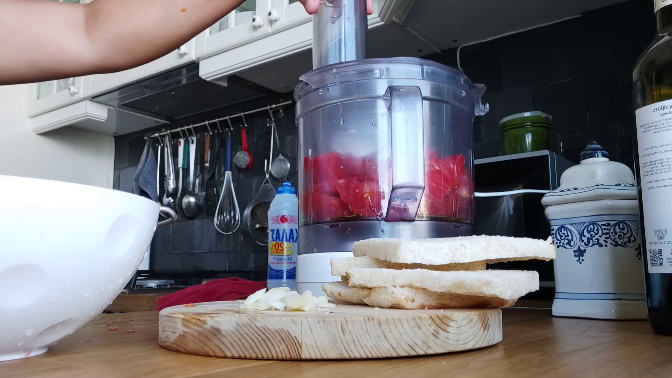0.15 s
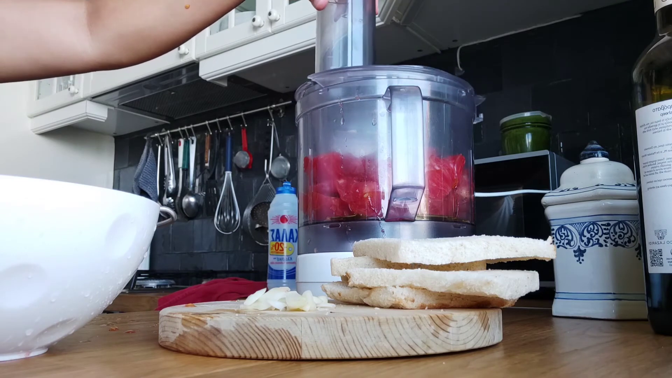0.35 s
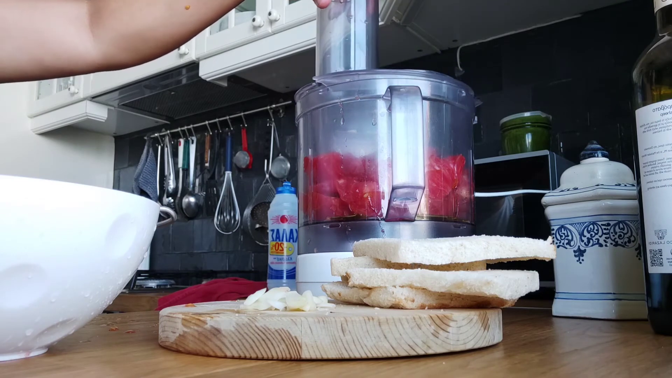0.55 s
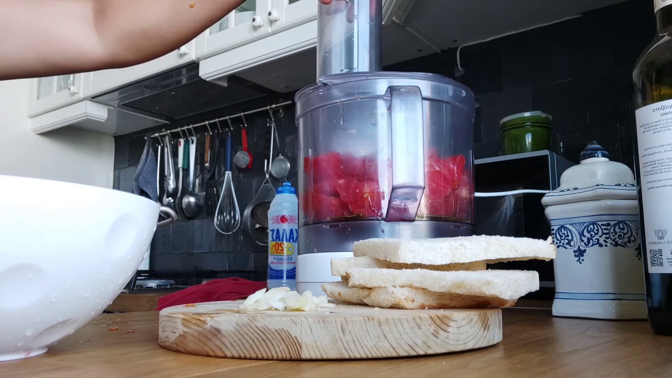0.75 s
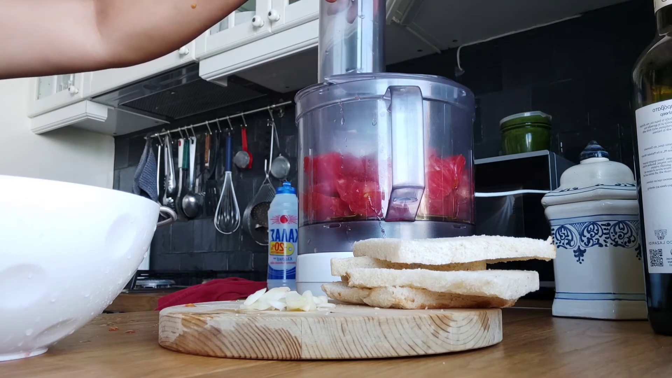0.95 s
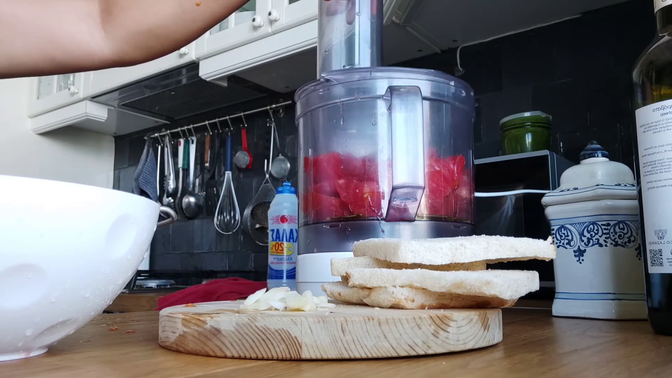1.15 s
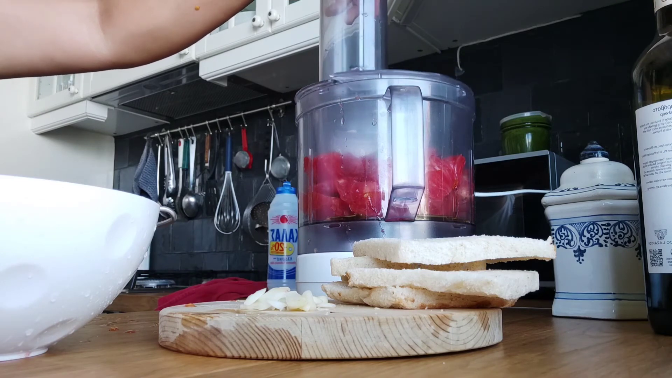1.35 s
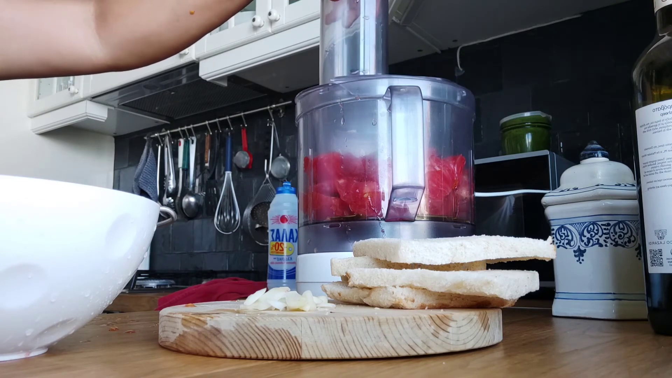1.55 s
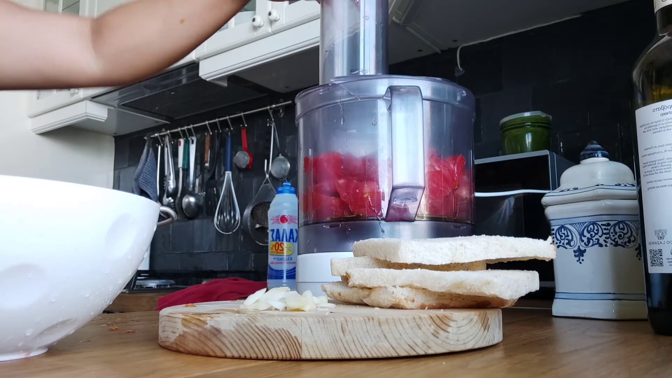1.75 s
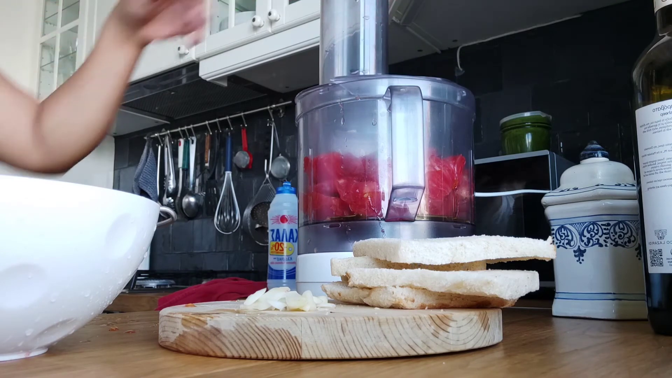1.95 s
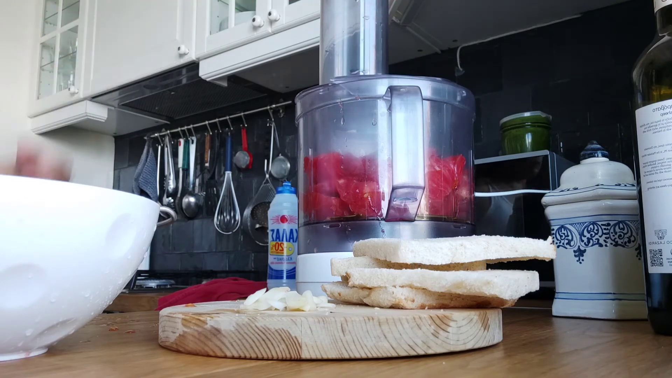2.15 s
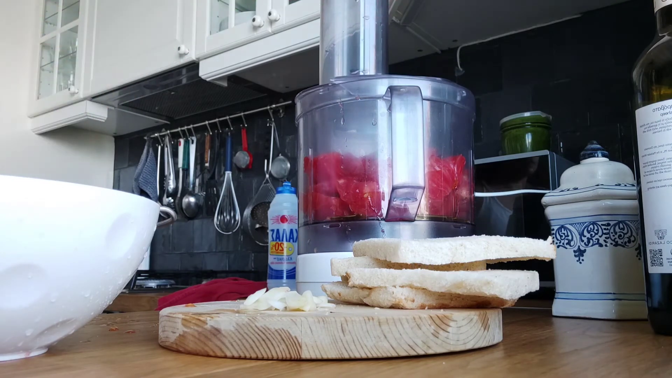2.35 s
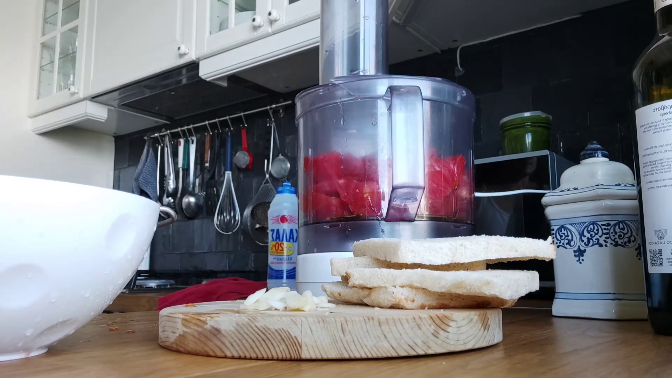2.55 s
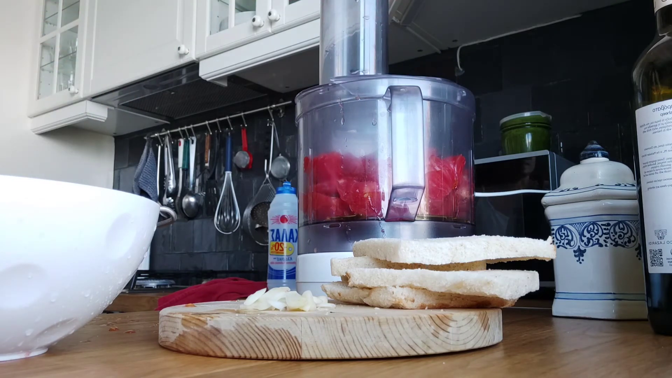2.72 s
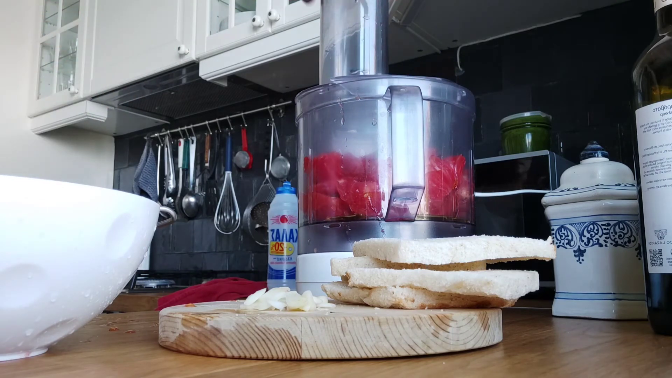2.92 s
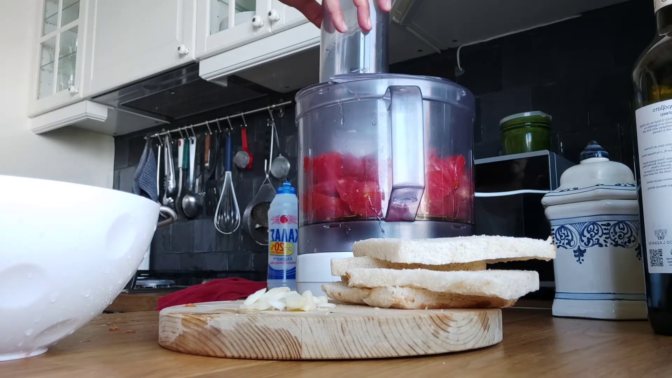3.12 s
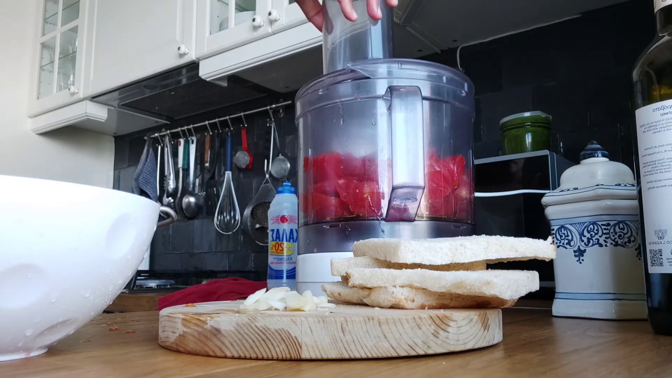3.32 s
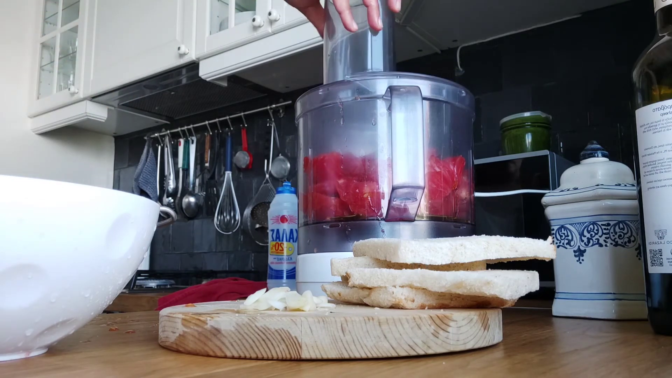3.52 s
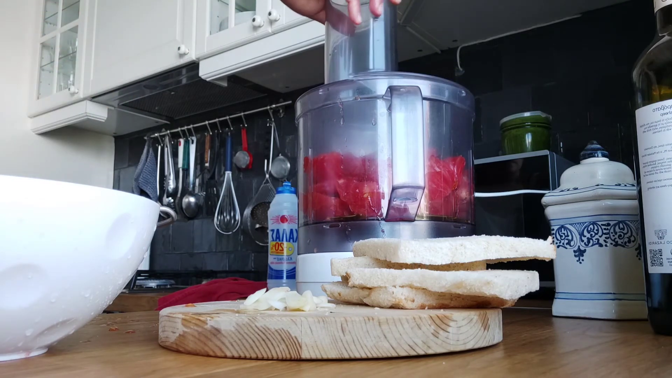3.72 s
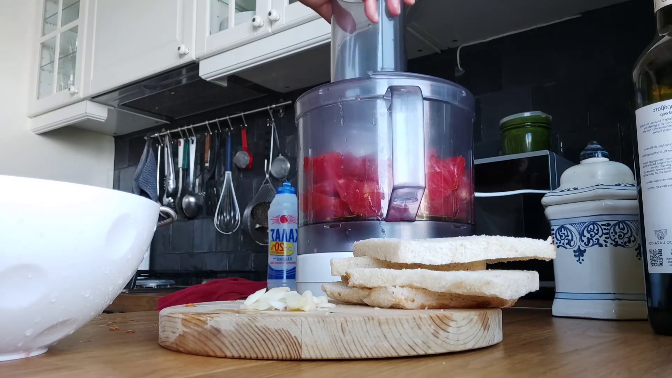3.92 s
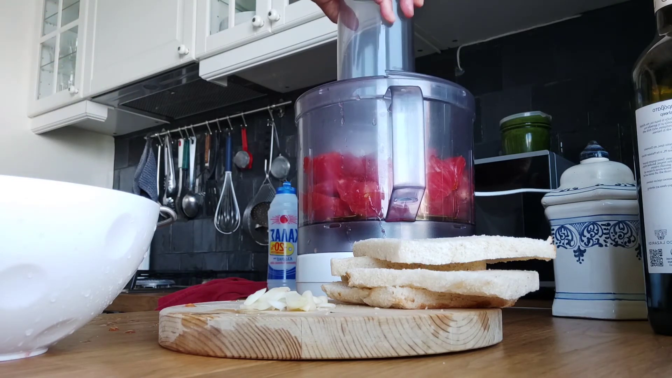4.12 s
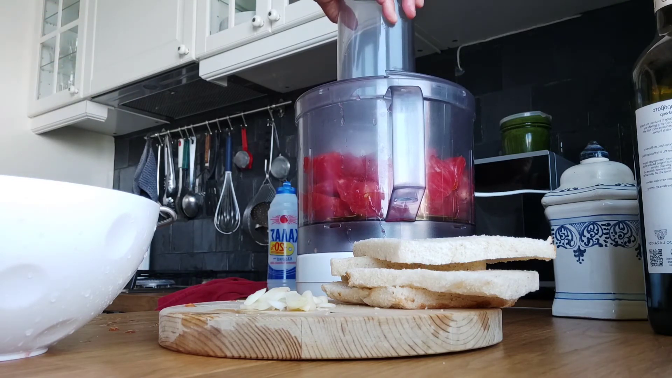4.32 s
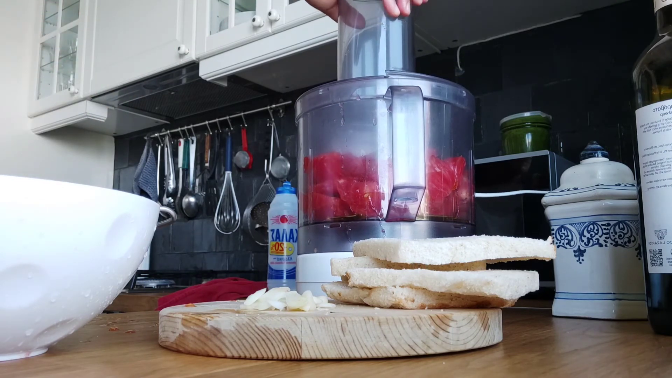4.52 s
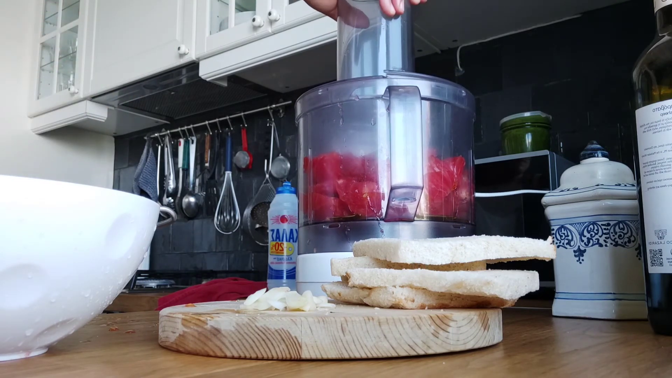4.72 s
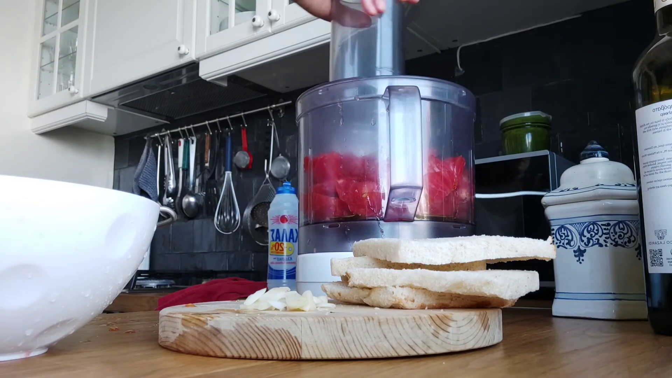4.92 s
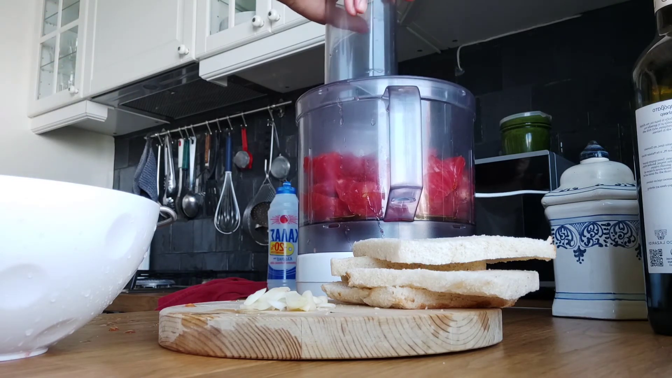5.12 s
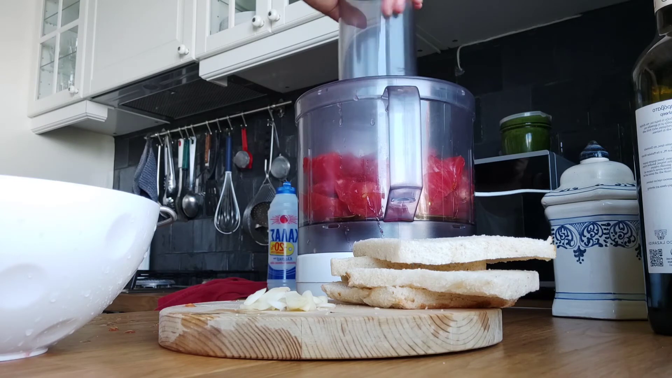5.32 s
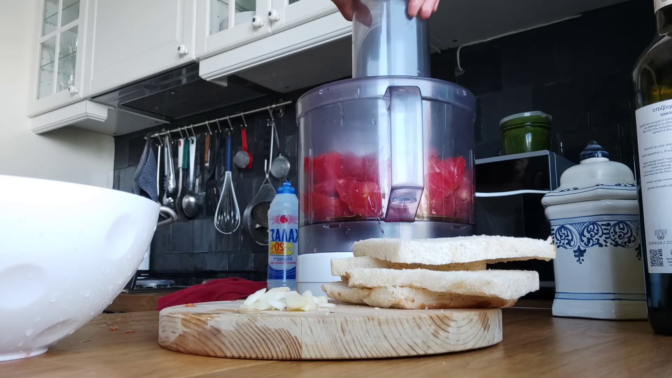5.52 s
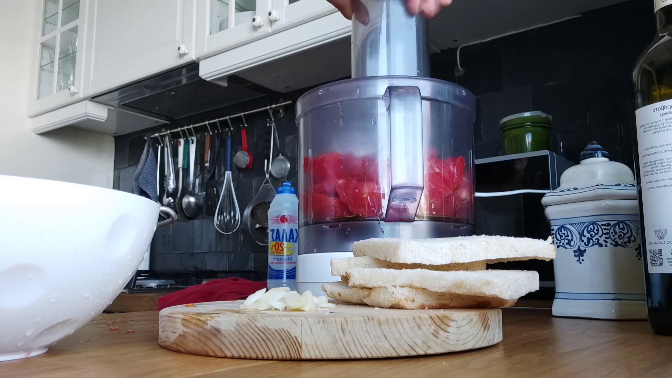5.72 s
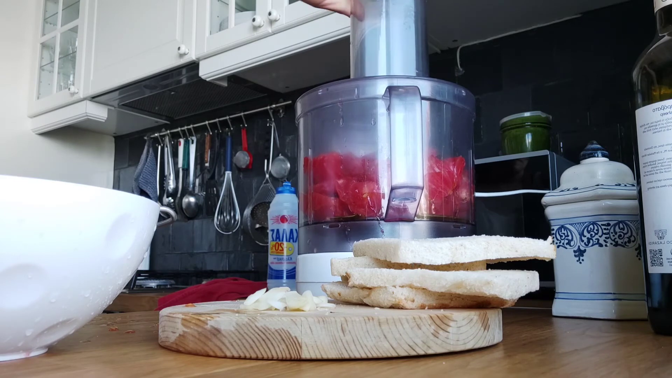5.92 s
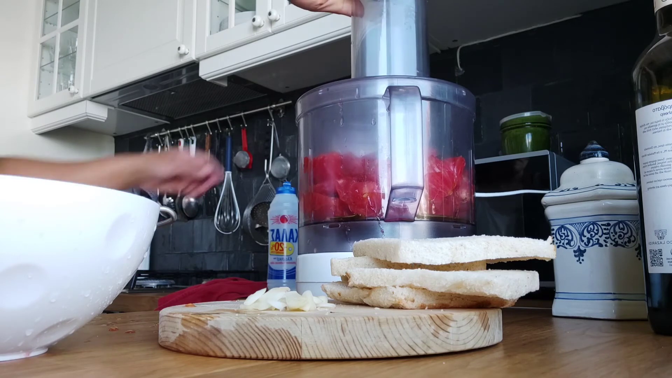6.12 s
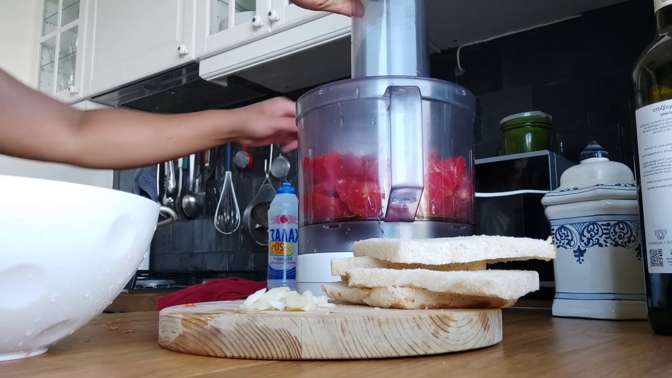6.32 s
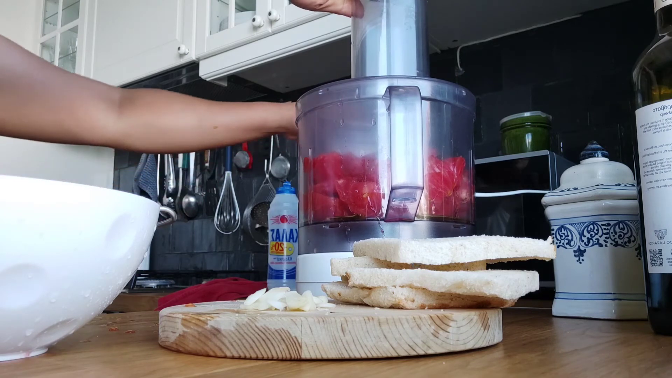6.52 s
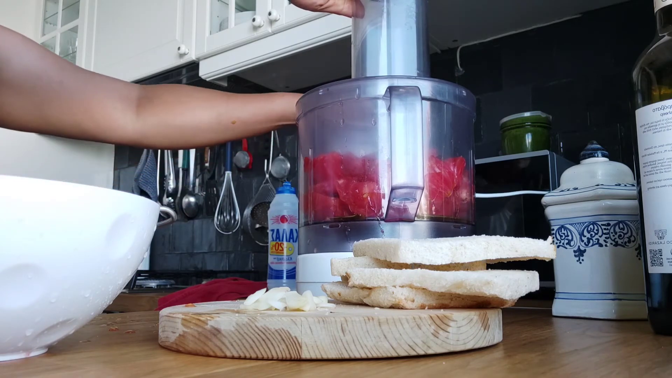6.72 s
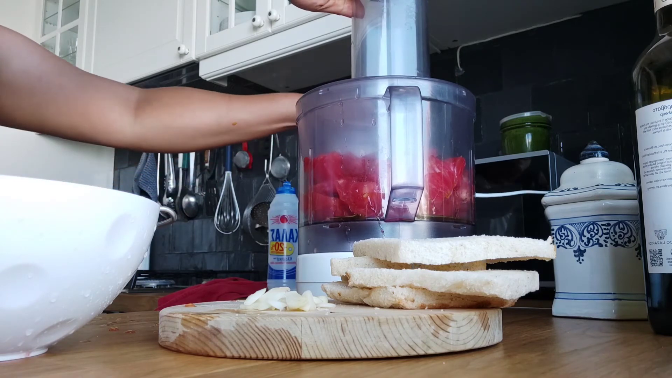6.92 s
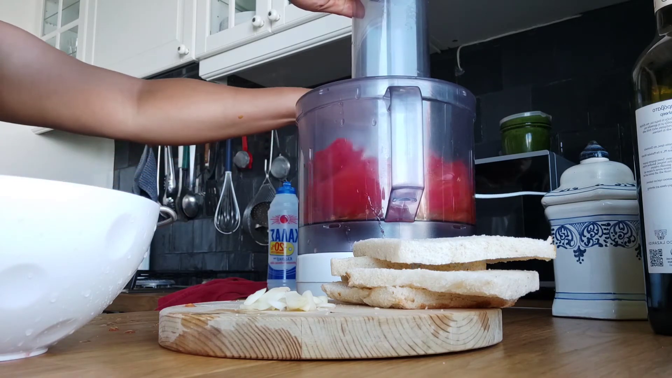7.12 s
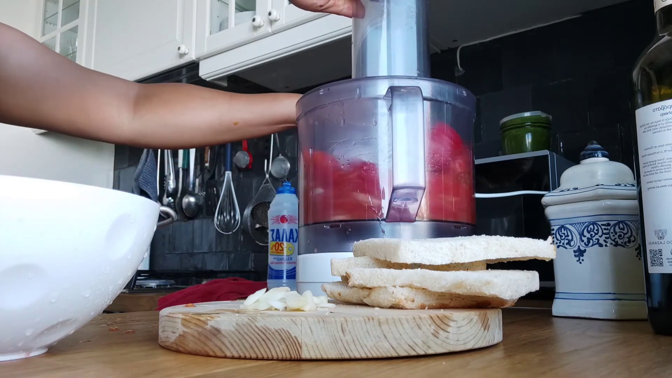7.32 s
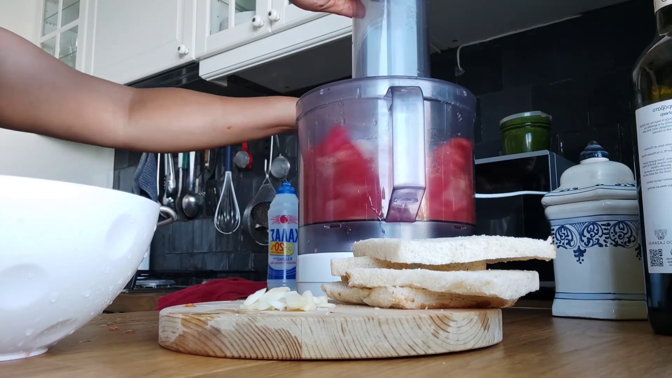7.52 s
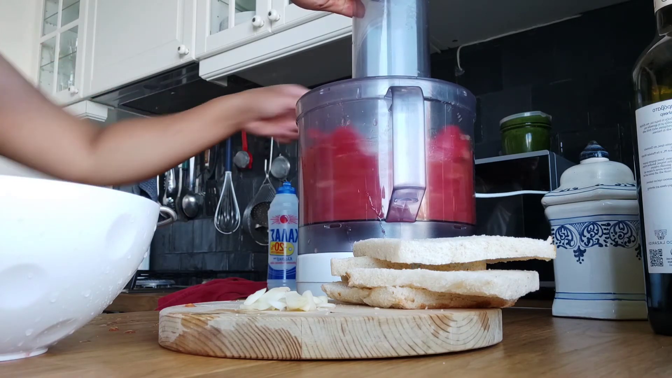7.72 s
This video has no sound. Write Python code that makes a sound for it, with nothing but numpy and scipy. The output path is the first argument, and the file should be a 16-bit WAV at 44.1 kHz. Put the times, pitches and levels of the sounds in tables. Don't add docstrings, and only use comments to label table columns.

```python
import sys
import numpy as np
from scipy import signal
from scipy.fft import rfft, irfft, next_fast_len
from scipy.io import wavfile
from scipy.ndimage import uniform_filter1d

SR = 44100
rng = np.random.default_rng(int(sys.argv[2]) if len(sys.argv) > 2 else 0)


def wav_out(sig):
    wavfile.write(sys.argv[1], SR, np.round(np.clip(np.atleast_2d(sig).T, -1, 1) * 32767).astype(np.int16))


def boost_factor(decibels):
    exponent = np.asarray(decibels, float) / 20
    return 10 ** exponent


N = 346626
T = np.arange(N) / SR
SIZE = next_fast_len(N)

# start in seconds, wall level in dB, wall note in Hz,
# bowl air level in dB, crack level in dB.
LID_TURN_KNOCKS = [(0.004, -38.5, 1220, -47, -43.5), (0.08, -35, 956, -63, -49),
                   (0.145, -39, 475, -36, -49), (0.259, -25, 610, -27, -33),
                   (0.316, -16.5, 573, -23.5, -29.5), (0.348, -20, 578, -32, -31),
                   (0.37, -31, 600, -45, -52), (0.439, -53, 452, -59, -62), (0.49, -31, 1060, -36.5, -43.5),
                   (0.597, -68, 477, -41.5, -50), (0.704, -40, 964, -58, -51),
                   (0.815, -21.5, 1092, -32, -33.5), (0.944, -25, 480, -24.5, -32),
                   (1.101, -40, 532, -43, -44.5), (1.198, -48, 1050, -50, -55),
                   (1.253, -27.5, 424, -19, -33.5), (1.309, -35, 560, -42, -44),
                   (1.367, -51, 505, -33.5, -55), (1.452, -27.5, 430, -29, -32.5),
                   (1.536, -31, 540, -34.5, -57)]
# start in seconds, wall level in dB, wall note in Hz,
# bowl air level in dB, crack level in dB.
TOUCH_KNOCKS = [
    (3.117, -37, 545, -49, -43),
    (3.135, -33, 706, -38, -53),
    (3.214, -45, 680, -48, -44),
    (3.251, -30, 1085, -29.5, -25.5),
    (3.302, -30, 550, -29, -39),
]
# start in seconds, wall level in dB, wall note in Hz,
# bowl air level in dB, crack level in dB.
ENTERING_KNOCKS = [
    (3.367, -19.5, 465, -36, -35),
    (3.425, -14, 460, -27.5, -24.5),
    (3.443, -25, 506, -31, -49),
    (3.484, -25, 572, -25.5, -28),
    (3.5, -33, 494, -45, -53),
]
# start in seconds, wall level in dB, wall note in Hz,
# bowl air level in dB, crack level in dB.
PLUGGED_KNOCKS = [(3.728, -40, 1100, -46, -42.5), (3.774, -41.5, 1050, -47, -52),
                  (3.825, -36, 530, -43, -45), (3.895, -24.5, 525, -26, -29.5), (3.959, -51, 616, -43, -39),
                  (4.011, -20, 890, -20.5, -32), (4.15, -46, 1087, -31, -26.5), (4.393, -38, 887, -70, -44),
                  (4.468, -31, 510, -28.5, -35.5), (4.509, -33.5, 520, -39.5, -42),
                  (4.655, -33, 408, -59, -51), (4.798, -35.5, 505, -37, -43)]
# start in seconds, wall level in dB, wall note in Hz,
# bowl air level in dB, crack level in dB.
LOCKING_KNOCKS = [(4.91, -18, 1100, -21.5, -17), (5.104, -27, 477, -30.5, -31),
                  (5.234, -32.5, 990, -33, -38), (5.251, -31, 458, -24.5, -46),
                  (5.283, -26.5, 650, -35, -33.5), (5.311, -27.5, 495, -25, -35),
                  (5.416, -25, 503, -30, -32.5), (5.465, -41, 466, -32, -32.5),
                  (5.511, -9.5, 870, -19, -15.5), (5.711, -52, 855, -41.5, -36),
                  (5.83, -38, 1056, -40, -40), (6.114, -45.5, 1110, -44, -49), (6.215, -47, 860, -44, -45),
                  (6.279, -40.5, 867, -44, -41), (6.479, -59, 1080, -68, -47)]
# start in seconds, wall level in dB, wall note in Hz, housing level in dB,
# crack level in dB.
SWITCH_KNOCKS = [
    (7.001, -30.5, 945, -35.5, -37.5),
    (7.027, -37, 813, -39, -61),
    (7.106, -11, 1046, -15, -21),
]
# start in seconds, wall level in dB, crack level in dB.
PIECES = [(7.217, -10, -18.5), (7.364, -12, -42), (7.415, -24, -37), (7.485, -8, -40), (7.568, -3, -20),
          (7.618, -10, -17.5), (7.712, -2, -32), (7.775, -28, -17.5)]

# mode in Hz, level in dB, t60 in seconds.
OPEN_AIR = [(384.6, 2.5, 0.17), (387.5, 6.5, 0.037), (274.6, -5, 0.072), (527, -12.5, 0.12),
            (165, -20.5, 0.2)]
# mode in Hz, level in dB, t60 in seconds.
ENTERING_AIR = [(279.8, -0.5, 0.6), (382, 0.5, 0.11), (158, -3.5, 0.11)]
# mode in Hz, level in dB, t60 in seconds.
PLUGGED_AIR = [(211.8, 2.5, 0.31), (161, -6, 0.36), (289.3, 7, 0.073), (393.2, -1, 0.16)]
# mode in Hz, level in dB, t60 in seconds.
HOUSING = [(530, 6.6, 0.06), (400, 13.3, 0.034), (240, 0.5, 0.057)]
# mode in Hz, level in dB, t60 in seconds.
WALL = [(640, -9, .04), (850, -9, .05), (1075, -9, .06), (1600, -15, .03)]
# frequency in Hz, density in dB per Hz.
CLATTER = [(300, -17), (450, 11), (650, 13.5), (850, 1.5), (1100, 3), (1400, 0.5), (2200, -45)]
# frequency in Hz, density in dB per Hz.
CRACK = [(800, 7.5), (1150, 6), (1400, 2.5), (1700, 5), (2200, -0.5), (2800, -1), (3500, -7), (4300, -10.5),
         (6000, -62)]
# frequency in Hz, density in dB per Hz.
TICK = [(2240, -6.5), (2900, -5), (3800, -8.5), (4310, -9.5), (5290, -6.5), (6520, -5.5), (7400, 0.5),
        (8550, -1.5), (11000, -18), (14300, -25), (16000, -36)]

# start in seconds, length in
# seconds, # rub level in dB, hiss level in dB, weight on the worktop in dB.
STROKES = [(0.153, 0.19, -48.5, -60, -52), (0.3, 0.042, -37, -41, -45), (0.448, 0.15, -48, -75, -56),
           (0.797, 0.12, -49, -51, -68), (0.94, 0.04, -45, -49, -49), (1.242, 0.047, -51, -44, -49.5),
           (1.37, 0.12, -40.5, -41.5, -45), (2.547, 0.034, -79, -67, -75), (2.635, .03, -72, -57, -75),
           (2.68, 0.069, -79, -50.5, -75), (3.11, 0.12, -54, -48, -59), (3.271, 0.032, -32.5, -36, -36.5),
           (3.418, 0.077, -31, -35, -37), (3.766, 0.11, -46, -48.5, -64), (3.886, 0.051, -45.5, -48, -47),
           (4.01, 0.075, -39, -47.5, -44), (4.162, 0.025, -45, -59, -48.5), (4.48, 0.05, -42.5, -65, -72),
           (4.673, 0.27, -51.5, -67, -58), (4.934, 0.059, -33.5, -20, -43.5), (5.047, 0.11, -42, -28, -64),
           (5.27, 0.094, -37, -40, -42), (5.414, 0.12, -37, -40.5, -39), (5.545, 0.16, -39.5, -35, -64),
           (5.83, 0.1, -55.5, -54, -54.5), (6.088, 0.18, -56, -62, -61), (6.995, 0.26, -46, -41.5, -46)]
# time in seconds, note in Hz.
AIR_NOTE = [
    (3.36, 375),
    (3.4, 460),
    (3.47, 457),
    (3.5, 277),
    (3.66, 277),
    (3.72, 202),
    (5.25, 215),
    (5.33, 173),
]
# frequency in Hz, density in dB per Hz.
COUNTER = [(25, -12), (40, -3), (80, 3), (130, 0), (200, -57)]

# start in seconds, note in Hz, level in dB, t60 in seconds.
PINGS = [(0.268, 3220, -36, .03), (0.316, 985, -23.5, 0.11), (0.489, 1089, -30.5, 0.11),
         (0.532, 1150, -44, 0.044), (1.256, 1520, -45, 0.09), (1.259, 2680, -40.5, .1),
         (1.347, 1540, -48.5, 0.36), (1.366, 2720, -50, .08), (1.391, 1545, -52, .2),
         (1.539, 955, -44, 0.11), (3.258, 2420, -35, 0.046), (3.294, 1000, -32, 0.04),
         (3.333, 850, -33, .05), (3.368, 454, -24, .06), (3.376, 505, -17.5, 0.032),
         (3.425, 950, -10.5, 0.012), (3.432, 534, -18, 0.048), (3.444, 2770, -34, .05),
         (3.497, 600, -18, 0.029), (5.258, 330, -30, 0.062), (5.284, 550, -28, 0.032),
         (5.316, 800, -30, .02), (5.326, 700, -26, 0.015), (5.326, 1670, -32, 0.026),
         (5.376, 1170, -39, .08), (5.415, 1690, -30, .015), (5.444, 940, -29, 0.11),
         (5.453, 2680, -33, 0.059), (5.514, 1530, -16, 0.035), (5.528, 856, -17, 0.087)]
# start in seconds, note in Hz, level in dB, t60 in seconds.
CATCHES = [(0.82, 237, -27.5, 0.05), (0.943, 1590, -28.5, 0.034), (1.068, 384, -41.5, 0.18),
           (3.76, 686, -48, .04), (3.776, 230, -31, .06), (3.826, 221, -27, 0.11),
           (3.895, 1125, -23, 0.038), (3.901, 2700, -28, 0.035), (3.96, 237, -31, 0.09),
           (4.018, 905, -25, 0.07), (4.031, 860, -25, .05), (4.075, 212, -29, 0.15),
           (4.151, 1710, -19, .02), (4.151, 3020, -28, 0.013), (4.168, 1050, -31, .05),
           (4.467, 1690, -33, 0.033), (4.478, 298, -43, .03), (4.51, 1630, -38, .03),
           (4.511, 500, -34, .03), (4.68, 994, -38, 0.036), (4.808, 350, -34, .03), (4.903, 1480, -26, .03),
           (4.912, 2310, -9.5, 0.023), (5.321, 187, -25, 0.17), (5.464, 195, -21.5, 0.14),
           (5.715, 2270, -36, 0.051), (5.831, 1124, -34, 0.036), (5.84, 178.6, -43, 0.27),
           (6.113, 1610, -42, 0.048)]
# start in seconds, note in Hz, # level
# in dB, t60 in seconds.
LUMPS = [(7.242, 507, -14.5, 0.062), (7.3, 427, -9, 0.039), (7.363, 1050, -13, .06),
         (7.518, 700, -14, 0.05), (7.58, 468, -24, 0.036), (7.675, 1083, -15, 0.12), (7.81, 1050, -11, .04),
         (7.845, 1030, -14, .04), (4.914, 864, -33.5, 0.79), (4.913, 1100, -33, .2),
         (4.914, 1540, -28, 0.16), (4.914, 2910, -25, 0.22), (5.095, 1610, -30, 0.072),
         (.168, 389.4, -35, .25), (1.004, 385, -40, .08), (7.14, 260, -24.5, 0.23)]

# frequency in Hz, level in dB.
WHINE = [(650, -50), (1000, -36), (1110, -31), (1300, -52), (1990, -48), (2120, -33), (2230, -35),
         (2350, -32), (2950, -36), (3150, -41), (3330, -48), (5800, -52), (6400, -45), (6700, -48)]
# time in seconds, note in Hz, level in dB.
BLADE = [(7.46, 1350, -50), (7.54, 1470, -42), (7.62, 1590, -45), (7.7, 1710, -43), (7.78, 1800, -35),
         (7.86, 1870, -36)]
# frequency in Hz, density in dB per Hz.
CHOP = [(15, -34), (25, -15), (120, -10), (195, -5.5), (352, -6.5), (391, -3), (563, -8), (706, -5.5),
        (784, -10), (1070, -2.5), (1300, -15), (1600, -13.5), (2080, -50), (3520, -120)]
# frequency in Hz, density in dB per Hz.
FAN = [(760, -4.5), (1300, -11.5), (1760, -3), (1970, -5), (2160, -2.5), (2470, -4.5), (3200, -7),
       (5060, -15.5), (7500, -5), (8950, -10), (10500, -19), (14100, -27), (15000, -39)]
# frequency in Hz, left-right likeness from -1 to 1.
MOTOR_SAME = [(60, 0.66), (180, 0.89), (550, 0.55), (1650, -0.085), (4970, 0.0), (15000, -0.01)]

# frequency in Hz, density in dB per Hz.
ROOM = [(12, -50), (20, -5.5), (65, -11), (120, -15.5), (271, -14), (308, -15), (381, -12.5), (443, -16.5),
        (548, -15.5), (637, -24), (679, -19.5), (1100, -21.5), (1400, -30), (1900, -28.5), (2500, -23.5),
        (3300, -28.5), (4290, -62), (7260, -120)]
# frequency in Hz, left-right likeness from -1 to 1.
ROOM_SAME = [(60, 0.75), (180, 0.92), (550, 0.11), (1650, -0.031), (4970, 0.24), (15000, -1.92)]
# frequency in Hz, density in dB per Hz.
HISS = [(3300, -23.5), (3800, -20.5), (4050, -9.5), (5000, -3.5), (6000, -8.5), (7400, -0.5), (8300, -7),
        (9300, -12.5), (9700, -43), (11500, -36), (13200, -34), (14500, -55)]
# frequency in Hz, level in dB.
HUM = [(190, -70.5), (280, -69), (390, -68), (540, -83), (690, -75.5)]
# time in seconds, note in Hz, level in dB.
ENGINE = [
    (1.6, 60, -75),
    (1.75, 61, -59),
    (2.2, 63, -56),
    (2.7, 66, -56),
    (2.85, 67, -75),
]

# frequency in Hz, t60 in seconds.
KITCHEN = [(150, 0.29), (400, 0.38), (1000, 0.47), (2800, 0.46), (7300, 0.51), (12000, 0.34)]
# frequency in Hz, left minus right in dB.
FACING = [(300, 1), (1000, 3.5), (4000, -2.5), (7000, -3.5), (9000, 2), (13000, -6)]
# frequency in Hz, left minus right in dB.
PORTS = [(60, 6.5), (110, 1.5), (200, 8.5), (380, 1), (700, 6), (1290, 5), (2380, -0.5), (4400, -2.5),
         (6500, -5), (7800, -8), (8800, 7.5), (15000, -1)]
# frequency in Hz, threshold in dB.
THRIFT = [(700, -26), (1400, -3), (2600, 0), (3600, 4), (4100, 2), (5000, -8), (7000, -18), (9000, -3)]
# frequency in Hz, threshold in dB.
TOP_THRIFT = [(9600, 1.5), (11000, 1), (12500, -1.5), (14000, 0), (14500, 5), (15200, 16)]


def evened(x):
    return x / np.sqrt(np.mean(x ** 2) + 1e-20)


def read(points, hz):
    f, value = np.transpose(points)
    return np.interp(np.log(hz + 1), np.log(f + 1), value)


def curve(rows, column, off=-120.):
    rows = np.array(rows)
    return np.interp(T, rows[:, 0], rows[:, column], off, off)


def filtered(x, db):
    size = next_fast_len(x.shape[-1])
    gain = boost_factor(db(np.fft.rfftfreq(size, 1 / SR)))
    return irfft(rfft(x, size) * gain, size)[..., :x.shape[-1]]


def coloured(x, spectrum):
    closed = [(spectrum[0][0] / 4, spectrum[0][1] - 30)] + spectrum
    return evened(filtered(x, lambda hz: read(closed, hz)))


def pair(left, other, same):
    c = np.clip(read(same, np.fft.rfftfreq(SIZE, 1 / SR)), -1, 1)
    right = c * rfft(left, SIZE) + np.sqrt(1 - c ** 2) * rfft(other, SIZE)
    return np.array([left, irfft(right, SIZE)[:N]])


def lean(x, balance):
    return filtered(x, lambda hz: np.outer([.5, -.5], read(balance, hz)))


def drift(rate_hz):
    count = int(T[-1] * rate_hz) + 2
    return evened(np.interp(T * rate_hz, np.arange(count), rng.standard_normal(count)))


def tone(hz):
    return np.sin(2 * np.pi * np.cumsum(hz) / SR)


def resonate(x, hz, width_hz):
    turn = np.exp(2j * np.pi * np.cumsum(hz * np.ones(len(x))) / SR)
    r = np.exp(-np.pi * width_hz / SR)
    smooth = signal.lfilter([(1 - r) ** 2], [1, -2 * r, r * r], x / turn + 1e-18)
    return 2 * (turn * smooth).real


def quiet():
    murmur = coloured(pair(*rng.standard_normal((2, N)), ROOM_SAME), ROOM)
    room = boost_factor(-55.5 + 0.11 * drift(7.7)) * murmur
    hiss = boost_factor(-48) * coloured(rng.standard_normal((2, N)), HISS)
    drone = 0
    for hz, db in HUM:
        level = boost_factor(db + 3.5 + 1.6 * drift(22))
        drone = drone + level * np.sin(2 * np.pi * hz * T + 1.6 * drift(6.3))
    engine = boost_factor(curve(ENGINE, column=2) - 0.5) * tone(curve(ENGINE, column=1, off=62.4))
    return room + hiss + drone + engine


def ring(modes, t, rise_s, spread_db):
    x = 0
    for hz, db, t60 in modes:
        level = boost_factor(db + spread_db * rng.standard_normal() - 60 * t / t60)
        x = x + level * np.sin(2 * np.pi * (hz * rng.uniform(0.96, 1.03) * t + rng.random()))
    x = x * (1 - np.exp(-t / rise_s))
    return x / abs(x).max()


def rattles(count):
    likeness = 0.15
    ports = []
    for _ in range(2):
        grain = boost_factor(0.71 * rng.standard_normal(count // 40 + 1)).repeat(40)[:count]
        ports.append(rng.standard_normal((2, count)) * grain)
    left, other = ports
    return left, likeness * left + np.sqrt(1 - likeness ** 2) * other


def knocks(rows, air):
    hard_db, tick_db_at_hard, tick_db_per_crack_db = -13, -11.5, 1.47
    out = np.zeros((2, N + SR))
    t = np.arange(SR // 4) / SR
    grip = 0.26 + 0.86 / (1 + (t / 0.027) ** 8)
    touch = 1 - np.exp(-(t / .0025) ** 2)
    for s, wall_db, wall_hz, air_db, crack_db in rows:
        tick_db = tick_db_at_hard + tick_db_per_crack_db * (crack_db - hard_db)
        hum = boost_factor(air_db + 2) * ring(air, t, .011, 2.) * grip
        wall = boost_factor(wall_db - 1) * ring([(wall_hz, 0, .06)] + WALL, t, .002, 3.)
        clatter = boost_factor(wall_db - 11.5 - 60 * t / 0.14) * coloured(rng.standard_normal(len(t)), CLATTER)
        body = hum + wall + clatter
        at = round((s - .002) * SR)
        for side, rattle in zip(out, rattles(len(t))):
            crack = boost_factor(crack_db - 0.5 - 60 * t / 0.13) * coloured(rattle[0], CRACK)
            tick = boost_factor(tick_db + 3.5 - 60 * t / 0.088) * coloured(rattle[1], TICK)
            side[at:at + len(t)] += (body + crack + tick) * touch
    return out[:, :N]


def hand_knocks():
    piece_hz, piece_air_over_crack_db = 1050, 5
    pieces = [(s, wall_db, piece_hz, crack_db + piece_air_over_crack_db, crack_db)
              for s, wall_db, crack_db in PIECES]
    x = knocks(LID_TURN_KNOCKS + TOUCH_KNOCKS, OPEN_AIR)
    x = x + knocks(ENTERING_KNOCKS, ENTERING_AIR)
    x = x + knocks(PLUGGED_KNOCKS + LOCKING_KNOCKS, PLUGGED_AIR)
    x = x + knocks(SWITCH_KNOCKS, HOUSING)
    x = x + boost_factor(-11) * knocks(pieces, HOUSING)
    return signal.sosfilt(signal.butter(2, 110, "high", fs=SR, output="sos"), x)


def kitchen(x):
    taps = np.zeros((2, SR))
    at = np.arange(200, SR - 20, 20) + rng.integers(0, 20, (2, (SR - 201) // 20))
    np.put_along_axis(taps, at, rng.choice([-1., 1.], at.shape), 1)
    hz, t, z = signal.stft(taps, SR, nperseg=256)
    decay = boost_factor(-60 * t / read(KITCHEN, hz)[:, None])
    tail = signal.istft(z * decay, SR, nperseg=256)[1]
    return signal.fftconvolve(x, tail / np.linalg.norm(tail[0]), axes=1)[:, :N]


def stroke(start_s, length_s):
    grab_db_per_s, sag_db_per_s, leave_db_per_s, grab_s = 435, 15.5, 135, 0.013
    t = T - start_s
    hold_db = np.minimum(grab_db_per_s * t, -sag_db_per_s * t)
    onset_db = (np.minimum(t, 0) / grab_s) ** 2
    return boost_factor(hold_db - onset_db - leave_db_per_s * np.maximum(t - length_s, 0))


def slides():
    low, hiss, thud = sum(np.outer(boost_factor(dbs), stroke(s, length)) for s, length, *dbs in STROKES)
    slips = rng.standard_normal(N) * boost_factor(2.9 * drift(60))
    air_hz = np.interp(T, *np.transpose(AIR_NOTE))
    hum = evened(resonate(slips, air_hz, 90))
    hum = hum + 1.32 * evened(resonate(slips, 485, 360))
    hum = hum + 0.5 * evened(resonate(slips, 860, 490))
    fine = coloured(rng.standard_normal((2, N)), TICK)
    fine = fine + boost_factor(-10) * coloured(rng.standard_normal((2, N)), CRACK)
    rub = boost_factor(-1) * low * evened(hum)
    scrape = boost_factor(-2) * hiss * fine * boost_factor(drift(120))
    return rub + scrape + boost_factor(-3.5) * thud * coloured(slips, COUNTER)


def pings():
    out = np.zeros(N + SR)
    t = np.arange(SR // 2) / SR
    push = 1 - np.exp(-t / 0.00094)
    for s, hz, db, t60 in PINGS + CATCHES + LUMPS:
        out[round(s * SR):][:len(t)] += boost_factor(db - 60 * t / t60) * push * np.sin(2 * np.pi * hz * t)
    return out[:N]


def chopping():
    lumps_per_s = 500
    size = boost_factor(2 * np.minimum(rng.exponential(1, N), 3))
    lumps = (rng.random(N) < lumps_per_s / SR) * size * rng.choice([-1, 1], N)
    drive = evened(lumps) + 1.3 * rng.standard_normal(N)
    return evened(coloured(drive, CHOP) + 0.13 * evened(resonate(drive, 1100, 160)))


def motor():
    on_s, spin_up_s, bite_s = 7.11, .17, 0.11
    mesh_start_hz, mesh_gain_hz, creep_hz_per_s = 582, 505, 20
    idle_db = -9
    chop_db, chop_empty_db = -19.5, -5
    air_db, air_empty_db = -24.5, -4
    t = np.maximum(T - on_s, 0)
    speed = np.tanh(t / spin_up_s)
    waver = 1 + 0.004 * drift(70)
    mesh_hz = mesh_start_hz + mesh_gain_hz * speed + creep_hz_per_s * t
    turns = np.cumsum(mesh_hz * waver) / SR
    whine = 0
    for k in (1, 2, 3, 6):
        level_db = read(WHINE, k * mesh_hz) + idle_db * (1 - speed) + 3 + 2.5 * drift(50)
        whine = whine + boost_factor(level_db) * np.sin(2 * np.pi * k * turns)
    blade_db = curve(BLADE, column=2) + 4 + 1.5 * drift(60)
    blade = boost_factor(blade_db) * tone(curve(BLADE, column=1, off=0.) * waver)
    slosh = drift(45)
    droplets = boost_factor(0.44 * rng.standard_normal(N // 60 + 1)).repeat(60)[:N]
    spray = rng.standard_normal((2, N)) * droplets
    rotation = 1 + 0.094 * np.sin(2 * np.pi * turns / 5)
    air = coloured(spray, FAN) * rotation * boost_factor(0.9 * slosh)
    chop = pair(chopping(), chopping(), MOTOR_SAME) * boost_factor(1.1 * slosh)
    empty = np.exp(-(t / bite_s) ** 3)
    noise = boost_factor(chop_db + chop_empty_db * empty) * chop + boost_factor(air_db + air_empty_db * empty) * air
    return np.clip(t / .04, 0, 1) * (noise + whine + blade)


def scene():
    background = quiet()
    hands = hand_knocks()
    notes = pings()
    echo = kitchen(hands + boost_factor(-9) * notes)
    return lean(hands + notes, FACING) + boost_factor(-4) * echo + slides() + motor() + background


def thinned(x):
    edge_hz, top_hz, keep_db, dip_db, patchy_db = 9660, 15780, 6.5, -10, 5.5
    n, k = np.arange(2048), np.arange(1024)
    hz = (k + .5) * SR / 2048
    lead, frames = 2048 - 504, N // 1024 + 4
    rise = np.cumsum(np.kaiser(1025, 4 * np.pi))
    rise = np.sqrt(rise[:-1] / rise[-1])
    window = np.r_[rise, rise[::-1]][:, None]
    basis = window * np.cos(np.pi / 1024 * np.outer(n + 512.5, k + .5)) / np.sqrt(512)
    padded = np.pad(x, ((0, 0), (lead, 1024 * (frames + 1) - lead - N)))
    blocks = padded.reshape(2, -1, 1024)
    z = blocks[:, :-1] @ basis[:1024] + blocks[:, 1:] @ basis[1024:]

    around_db = 10 * np.log10(abs(uniform_filter1d(z ** 2, size=41, axis=2)) + 1e-20)
    around_db = uniform_filter1d(around_db, size=5, axis=1)
    above = hz > edge_hz
    patches = evened(uniform_filter1d(rng.standard_normal((frames, 128)), size=2, axis=0))
    patches = patches[:, np.where(above, k // 16 + 60, k // 10)]
    high_db = keep_db + read(TOP_THRIFT, hz) - 1.5 * patches
    step_db = np.where(above, high_db, dip_db + read(THRIFT, hz)) + patchy_db * patches
    top = (z ** 2).mean(0)[:, above].mean(1)
    sudden = (top > 8 * np.roll(top, 2)) & (top > .03 * top.max())
    kept = (sudden[:, None] | (abs(z) > boost_factor(around_db + step_db))) & (hz < top_hz)

    parts = (z * kept) @ basis.T
    joined = parts[:, 1:, :1024] + parts[:, :-1, 1024:]
    return joined.reshape(2, -1)[:, lead - 1024:][:, :N]


def band_limit(x):
    return signal.sosfilt(signal.butter(12, 16110, fs=SR, output="sos"), x)


def record(dry):
    ports = .95 * np.tanh(lean(dry, PORTS) / .95)
    turn = np.array([[1, 1], [1, -1.03]]) / np.sqrt(2)
    mix = turn @ thinned(turn @ ports)
    return band_limit(mix)


dry = scene()
out = record(dry)
wav_out(out)
```